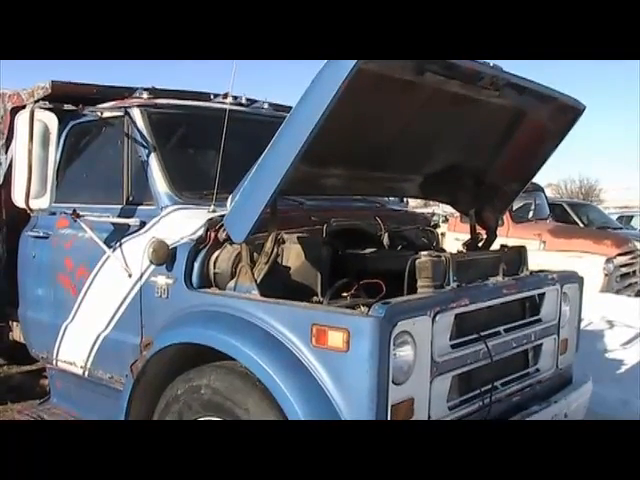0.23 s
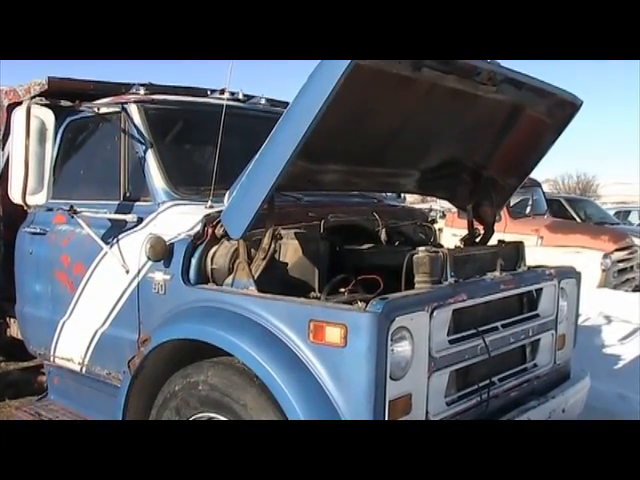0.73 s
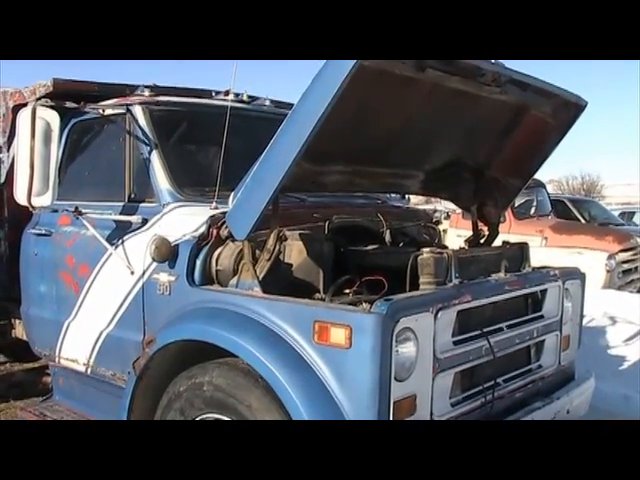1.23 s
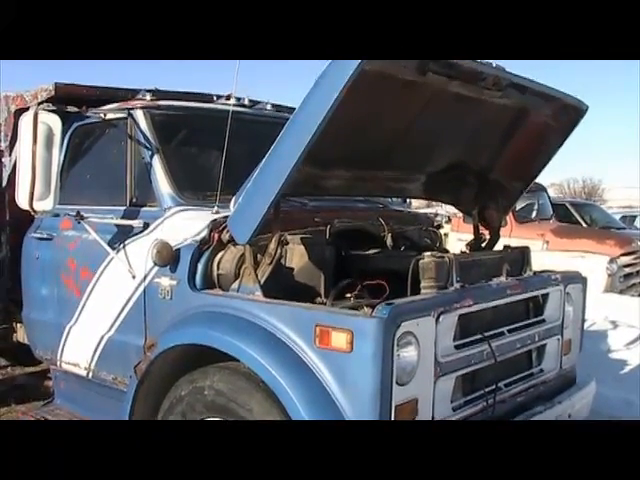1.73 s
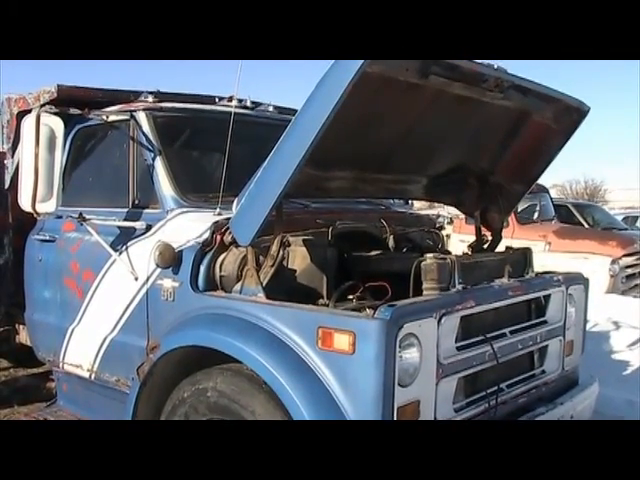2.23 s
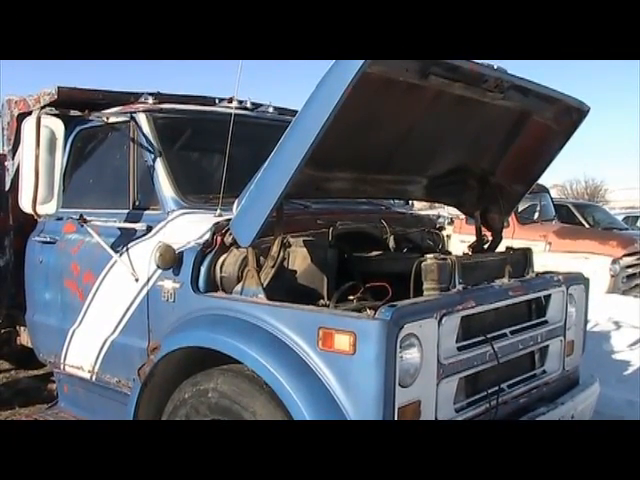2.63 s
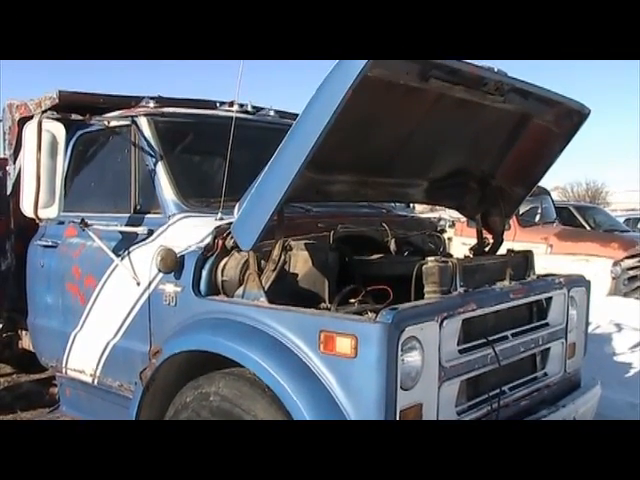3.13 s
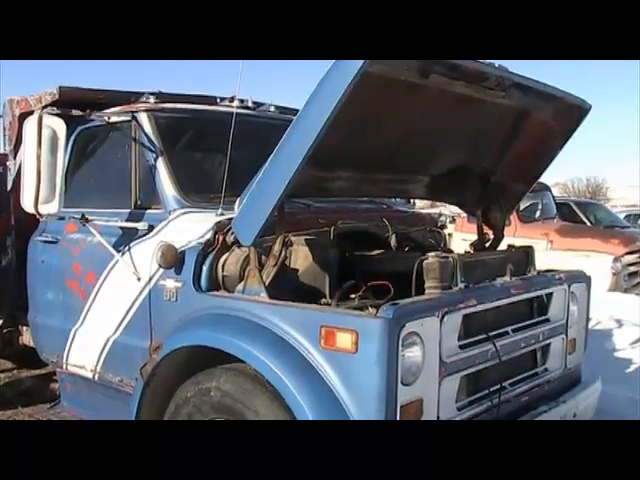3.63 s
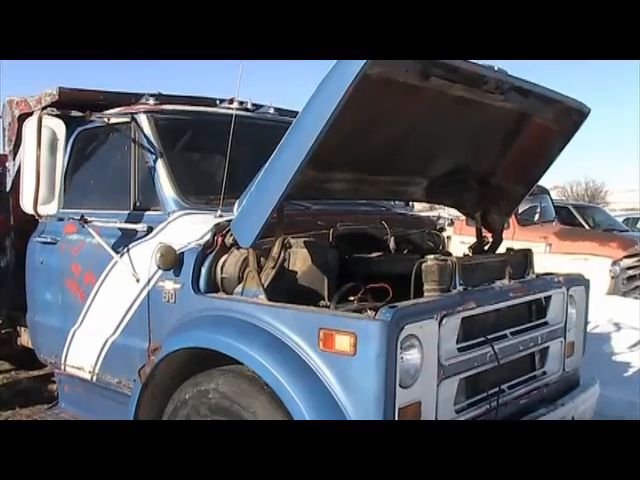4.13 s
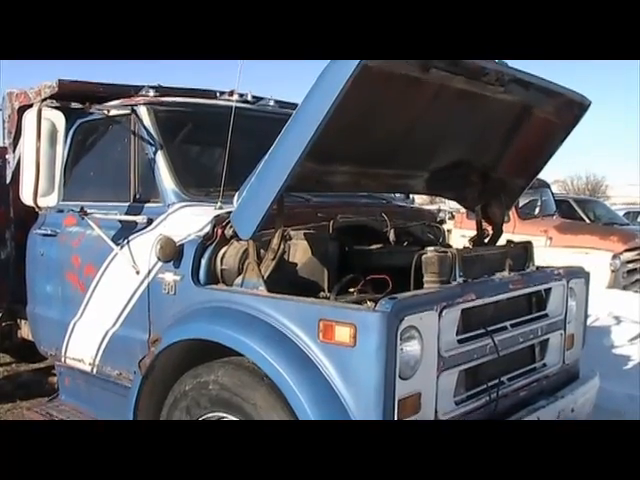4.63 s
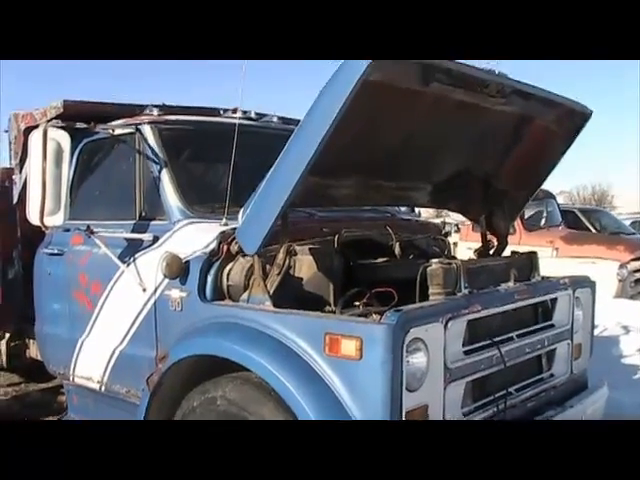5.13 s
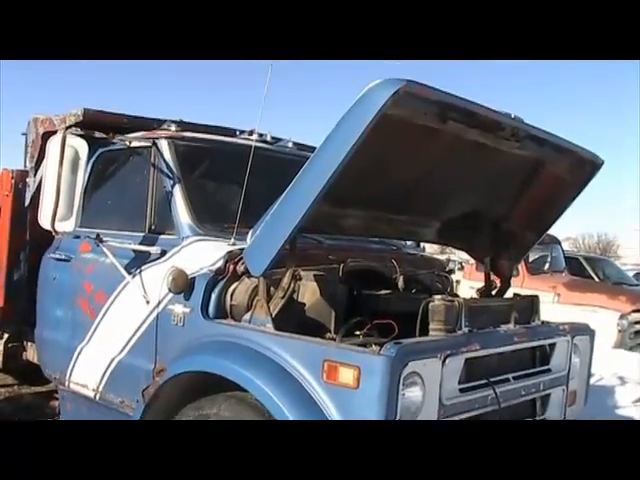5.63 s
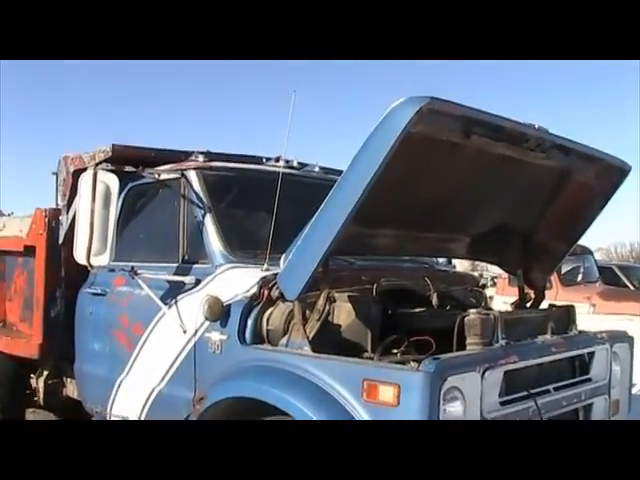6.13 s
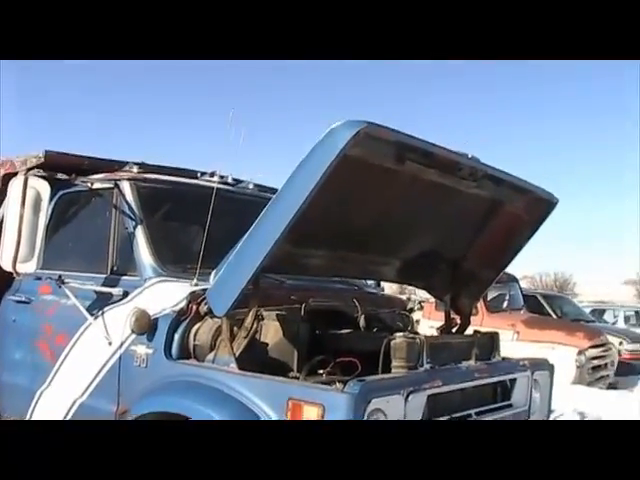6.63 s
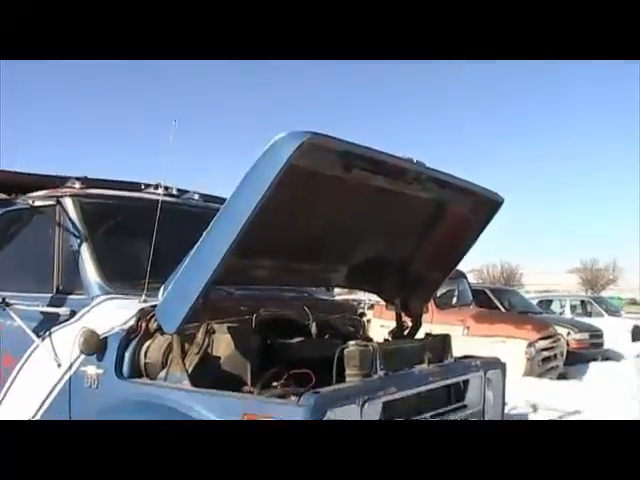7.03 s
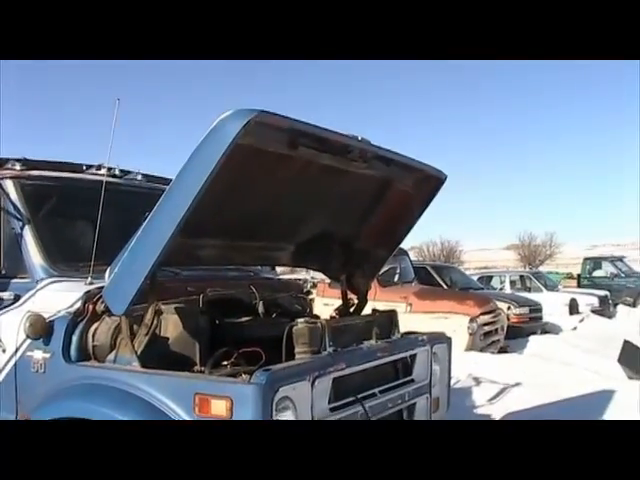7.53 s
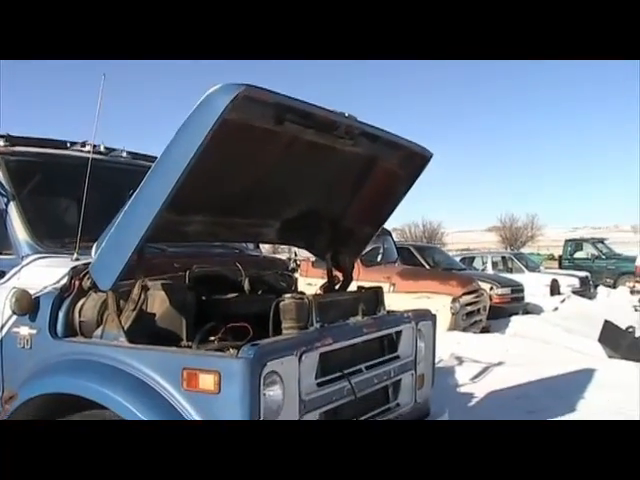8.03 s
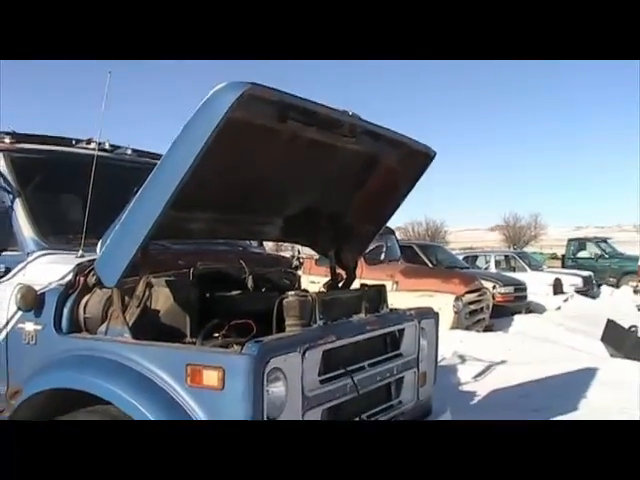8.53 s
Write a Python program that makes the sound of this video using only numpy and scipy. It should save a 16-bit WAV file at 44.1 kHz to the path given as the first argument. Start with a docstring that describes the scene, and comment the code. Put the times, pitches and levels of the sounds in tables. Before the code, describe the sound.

An old truck engine sputters out, its pedal clanks through several pumps, then the starter grinds and the engine catches into a lumpy, clacking, slowing idle.

```python
"""An old V8 truck outdoors, hood open, in quiet air with lumps of wind and a small camera's faint ticks.
First the engine sputters out: single puffs ring the exhaust pipe, air leaks whistle, a whir runs down.
Then the throttle pedal is pumped: filtered noise scrapes, and noise bursts ring rods and cab floor as blows.
The starter engages and grinds, its tooth noise ringing the bell housing over motor hum and whine.
The cylinders catch as a train of firings in the pipe; the idle turns lumpy and slows, with valve clacks."""
import sys
import numpy as np
from scipy import signal
from scipy.fft import rfft, irfft, next_fast_len
from scipy.io import wavfile
from scipy.ndimage import uniform_filter1d

SR = 44100
rng = np.random.default_rng(int(sys.argv[2]) if len(sys.argv) > 2 else 0)


def to_wav(s):
    """Save 16-bit WAV."""
    ch = np.atleast_2d(s).T  # columns
    pcm = np.round(np.clip(ch, -1, 1) * 32767)  # PCM
    wavfile.write(sys.argv[1], SR, pcm.astype(np.int16))


N = 387638


def amp(db):
    """Turns decibels into a gain."""
    return 10 ** (np.asarray(db) / 20)


def unit(x):
    """Scales a sound to an RMS of one."""
    return x / np.sqrt(np.mean(x ** 2) + 1e-20)


def peak(x):
    """Scales a sound to a peak of one."""
    return x / abs(x).max()


def noise():
    """White noise as long as the scene."""
    return rng.standard_normal(N)


def read(points, hz):
    """Reads a spectrum table along a logarithmic frequency axis."""
    f, value = np.transpose(points)
    return np.interp(np.log(hz + 1), np.log(f + 1), value)


def curve(rows, column=1):
    """Draws a table column over time as straight lines."""
    rows = np.array(rows)
    return np.interp(np.arange(N) / SR, rows[:, 0], rows[:, column])


def level(rows, column=1):
    """Gain along a dB column, silent outside the table, with 10 ms edges."""
    t = np.arange(N) / SR
    inside = (t >= rows[0][0]) & (t <= rows[-1][0])
    return amp(curve(rows, column)) * uniform_filter1d(inside * 1., 441)


def add(mix, s, sound):
    """Lays a sound into the mix at s seconds."""
    part = mix[round(s * SR):][:len(sound)]
    part += sound[:len(part)]


def colour(x, points):
    """Filters a sound by a spectrum table in dB."""
    size = next_fast_len(len(x))
    return irfft(rfft(x, size) * amp(read(points, np.fft.rfftfreq(size, 1 / SR))), size)[:len(x)]


def resonate(x, hz, width):
    """One resonance: shifts hz down to zero, smooths, and shifts back."""
    turn = np.exp(2j * np.pi * np.cumsum(hz * np.ones(len(x))) / SR)
    r = np.exp(-np.pi * width / SR)
    return 2 * (turn * signal.lfilter([1 - r], [1, -r], x / turn)).real


def band(x, modes):
    """A drive heard through a set of resonances, added with alternating signs."""
    total = 0
    for k, (hz, width, db) in enumerate(modes):
        total = total + (-1) ** k * amp(db) * unit(resonate(x, hz, width))
    return unit(total)


def flutter(per_s, db):
    """Random level changes at about the given rate, with an RMS swing of db."""
    return amp(db * unit(uniform_filter1d(noise(), int(SR / per_s))))


def follow(train, decay_s):
    """A throb that jumps at each firing and dies away."""
    return signal.lfilter([1], [1, -np.exp(-1 / (decay_s * SR))], train)


def ring(modes, t, scatter_db, detune, count):
    """Impulse response of loose parts: every mode splits in a few, stirred differently by each blow."""
    hz, db, t60 = np.repeat(modes, repeats=count, axis=0).T[:, :, None]
    chance = rng.standard_normal((2, len(hz), 1))
    fade = amp(db + scatter_db * chance[0] - 60 * t / t60)
    return (fade * np.sin(2 * np.pi * hz * (1 + detune * chance[1]) * t)).sum(0)


# hiss of the yard and the camera: (frequency [Hz], spectrum level [dB per Hz])
AIR_SPECTRUM = [(15, -23), (25, -1), (322, -3), (358, -10), (399, -3.5), (455, -4), (1820, -15),
                (1970, -14.5), (2500, -19.5), (3260, -17.5), (7650, -24.5), (10800, -29), (14500, -38)]
# lumps of wind: (time [s], reference level [dB])
WIND = [(0.0, -39), (0.4, -38), (0.83, -58), (1.2, -55), (2.4, -55), (2.7, -49), (3.35, -44), (3.6, -59.5),
        (4.3, -73), (4.64, -48), (5.3, -49), (5.6, -37)]
AIR_DB = -49.5  # reference level of the hiss


def yard():
    """Quiet air, mostly unlike at the two ports, and low resonant lumps of wind."""
    shared, left, right = (unit(colour(noise(), AIR_SPECTRUM)) for _ in range(3))
    air = amp(AIR_DB) * (0.031 * shared + .5 * np.array([left, right]))
    gusts = np.minimum(flutter(12, 3.), 1.6)
    middle, side = (unit(resonate(resonate(noise() * gusts, 48, 45), 49, 110)) for _ in range(2))
    opposite = np.array([[1], [-1]])
    return air + level(WIND) * (middle + 0.81 * opposite * side)


# clear ticks: (time [s], relative peak level [dB])
CAMERA_TICKS = [(0.873, -50), (0.9023, -55.0), (0.931, -62.6), (1.0193, -51), (1.086, -51), (1.131, -60.5),
                (1.1692, -50), (1.2068, -55), (1.2351, -52), (1.2901, -54), (1.3194, -52), (1.4364, -51),
                (1.5028, -50), (1.5383, -56.6), (1.5866, -51), (1.6236, -54), (1.6532, -52), (1.6906, -55),
                (3.4907, -57), (3.5383, -49.5), (3.5716, -51.5), (3.6006, -60), (3.6385, -53),
                (3.6909, -61.5), (3.7218, -55), (3.7591, -55), (3.7886, -52), (3.8387, -52),
                (3.8675, -61.5), (3.9055, -52), (3.9409, -57.5), (3.9888, -52), (4.026, -55.7),
                (4.0556, -53), (4.1344, -67), (4.1722, -54.2), (4.2389, -50), (4.2915, -58), (4.3227, -56),
                (4.3601, -57)]
# random ticks, in runs: (start [s], end [s], count, middle of the relative level range [dB])
FAINT_TICKS = [(1.74, 3.47, 40, -56), (.84, 4.37, 70, -64)]
TICK_HZ, TICK_DB = 3270, -1


def camera():
    """A motor in the camera ticks unevenly, a high tick just ahead of the ring."""
    rows = [np.array(CAMERA_TICKS)]
    for first, last, count, middle_db in FAINT_TICKS:
        late, size = rng.random((count, 2)).T
        when = first + (np.arange(count) + .8 * late) * (last - first) / count
        rows.append(np.c_[when, middle_db + 3 - 6 * size])
    s, db = np.concatenate(rows).T
    train = np.zeros(N)
    train[(s * SR).astype(int)] = amp(db)
    body = resonate(resonate(train, TICK_HZ, 170), TICK_HZ, 340)
    ahead = resonate(resonate(train, 4200, 600), 4200, 1200)
    ticks = peak(body) + 0.49 * np.roll(peak(ahead), -round(.005 * SR))
    return train.max() * amp(TICK_DB) * ticks


# one pump, the rods sliding down and back: (time before the stop [s], level [dB])
STROKE_SHAPE = [(0.2, -11.5), (0.18, -2), (0.16, -2), (0.064, -5), (0.064, -20), (0.054, -7.5),
                (0.0042, 9.5)]
# all pumps: (time of the stop [s], level [dB], heard from [s before the stop], heard until [s before it])
PEDAL_STROKES = [(1.803, -35, 0.059, 0.019), (2.162, -36, 0.23, 0.017), (2.496, -35.5, 0.22, 0.019),
                 (2.819, -36, 0.21, 0.0028), (3.157, -37.5, 0.245, 0.0067), (3.5, -41, 0.52, 0.082)]
# sliding rods: (frequency [Hz], spectrum level [dB per Hz])
SCRAPE_SPECTRUM = [(88, -35), (150, -1.5), (211, 8), (297, 4), (426, -1.5), (1330, -8), (1460, -10),
                   (1640, -10), (2690, -17.5), (6070, -20), (14000, -44)]


def scrape():
    """Sliding rods: fluttering noise; every pump plays its share of the same stroke."""
    before, db = np.transpose(STROKE_SHAPE)
    slide = np.zeros(N)
    for stop, pump_db, first, last in PEDAL_STROKES:
        at = np.r_[first, before[(before < first) & (before > last)], last]
        slide += level(np.c_[stop - at, pump_db + np.interp(-at, -before, db)])
    return unit(colour(noise() * flutter(120, 2.7), SCRAPE_SPECTRUM)) * slide


# what is struck, by name: (floor thud [dB], brightness [dB], rattle decay [s], rise [s],
# first hard contact [relative to the rattle noise])
STRUCK_PARTS = {"pedal": (1, -37, .0135, .0026, 2), "rebound": (0, -12, .0105, .005, 3),
                "catch": (-3, 7, .016, .0013, 4), "rod": (-18, 1, .0145, .005, 0),
                "stop": (-12, 3, .0125, .003, 3), "slack": (-9, 1, .012, .008, 0),
                "solenoid": (-41, -4, .014, .024, 0), "pinion": (-39, 8, .012, .004, 2)}
# modes of the pedal linkage: (frequency [Hz], level [dB], T60 [s])
LINKAGE_MODES = [(344, 5.5, 0.21), (451, 6, 0.13), (492, 5.5, 0.12), (593, 1.5, 0.092), (790, 7, 0.053),
                 (972, 3.5, 0.035), (1131, -3, 0.091), (1265, -2, 0.14), (1580, -17, 0.26),
                 (2356, 8, 0.045), (2900, -7, 0.05), (3470, 3, 0.028), (3920, 4, 0.043),
                 (4580, 10.5, 0.027), (6500, -26, 0.022)]
# modes of the starter pinion and solenoid: (frequency [Hz], level [dB], T60 [s])
PINION_MODES = [(500, -18, 0.22), (650, -2, 0.087), (890, -5, 0.076), (1290, 1, 0.12), (1540, 7, 0.14),
                (2020, 0.5, 0.17), (3120, -30, 0.041), (3640, 0, 0.041), (4910, -18, 0.041),
                (6470, -1, 0.031)]
# modes of the cab floor: (frequency [Hz], level [dB], T60 [s])
FLOOR_MODES = [(156.6, -9, 0.5), (198, -5.5, 0.65), (273, -7, 0.41)]
PUSH_S = 0.002  # length of the shove that a blow gives the cab floor


def strike(part):
    """A rattle with one hard contact rings the struck metal and the cab floor."""
    t = np.arange(SR // 3) / SR
    thud_db, bright_db, rattle_s, rise_s, contact = STRUCK_PARTS[part]
    at_starter = part in ("solenoid", "pinion")
    modes = np.array(PINION_MODES if at_starter else LINKAGE_MODES)
    treble = modes[:, 0] > 2000

    drive = rng.standard_normal(len(t)) * np.exp(-t / rattle_s) * np.minimum(t / rise_s, 1) ** 2
    drive[round(rise_s * SR)] += contact

    def rung(part_modes):
        """The drive rung through some of the modes."""
        response = ring(part_modes, t[:SR // 5], 3.8, 0.059, count=9)
        return peak(signal.fftconvolve(drive, response)[:len(t)])

    low, high = rung(modes[~treble]), rung(modes[treble])
    shove = np.hanning(round(PUSH_S * SR))
    floor = peak(np.convolve(ring(FLOOR_MODES, t, 7.1, 0.066, count=4), shove)[:len(t)])
    crack = peak(resonate(drive, 4200, 5000 if at_starter else 13000))
    clash = peak(low + 0.6 * peak(resonate(drive, 1300, 660)))
    return clash + amp(bright_db) * (0.29 * high + 0.75 * crack) + amp(thud_db) * floor


# blows of pedal linkage and starter pinion: (time [s], relative level [dB], part)
METAL_BLOWS = [(1.76, -27, "rebound"), (1.777, -20, "rod"), (1.804, -10.5, "stop"), (2.039, -18.5, "pedal"),
               (2.052, -16.5, "rebound"), (2.1, -28.5, "catch"), (2.135, -15.5, "rod"),
               (2.145, -14.5, "rod"), (2.16, -4, "stop"), (2.374, -21, "pedal"), (2.388, -23, "rebound"),
               (2.44, -26, "catch"), (2.469, -16.5, "rod"), (2.479, -14, "rod"), (2.501, -7, "stop"),
               (2.713, -23, "pedal"), (2.731, -19.5, "rebound"), (2.775, -31.5, "catch"),
               (2.812, -11.5, "slack"), (2.979, -36, "catch"), (3.038, -29, "pedal"),
               (3.049, -18.5, "rebound"), (3.121, -25.5, "catch"), (3.153, -16, "slack"),
               (3.421, -32.5, "pedal"), (4.388, -12, "solenoid"), (4.41, -18.5, "pinion"),
               (4.443, -11, "pinion")]
# band of the blows: (frequency [Hz], gain [dB])
BLOW_BAND = [(40, -67), (130, -11), (200, 0.5), (300, -9.5), (420, 3), (6000, -1), (9000, -6.5),
             (13000, -8.5), (14500, -19)]
CAB_DB, CAB_T60_S, CAB_HZ, CAB_WIDTH_HZ = -23.5, 0.31, 800, 920


def blows():
    """Rods slam on their stops and last the pinion meshes; cab and engine bay answer each blow."""
    out = np.zeros(N)
    for s, db, part in METAL_BLOWS:
        add(out, s, amp(db) * strike(part))
    t = np.arange(SR // 3) / SR
    cab = resonate(rng.standard_normal(len(t)), CAB_HZ, CAB_WIDTH_HZ) * amp(-60 * t / CAB_T60_S)
    answer = signal.oaconvolve(out, cab / np.linalg.norm(cab))[:N]
    return colour(out + amp(CAB_DB) * answer, BLOW_BAND)


# the pinion seats: (time [s], length [s], level [dB])
PINION_SQUEAKS = [(4.41, .025, -18.5), (4.549, .05, -36), (4.636, .032, -34.5)]
SQUEAK_HZ, SQUEAK_WANDER_HZ = 1890, 23


def squeaks():
    """The seating pinion squeaks: short tones with rounded ends, wandering about a common pitch."""
    out = np.zeros(N)
    for s, length, db in PINION_SQUEAKS:
        size = round(length * SR)
        hz = SQUEAK_HZ + SQUEAK_WANDER_HZ * unit(uniform_filter1d(rng.standard_normal(size), 300))
        tone = np.sqrt(2) * np.sin(2 * np.pi * np.cumsum(hz) / SR)
        add(out, s, amp(db) * np.hanning(size) ** .5 * tone)
    return out


# starter: (time [s], grind level [dB], motor hum level [dB], gear whine level [dB])
STARTER_LEVELS = [(4.44, -19, -33, -16), (4.49, -33, -26.5, -66), (4.64, -30, -66, -53),
                  (4.89, -30.5, -66, -43), (5.1, -28.5, -57, -33), (5.45, -26, -33.5, -33),
                  (5.62, -24.5, -26.5, -36.5), (5.78, -19, -36, -27), (5.95, -18.5, -39, -47),
                  (6.06, -20, -27.5, -51), (6.2, -22, -22.5, -50), (6.31, -25, -44, -58),
                  (6.57, -25, -28, -51), (6.8, -29, -48, -34), (7.3, -35, -55, -45)]
# resonances of the housing: (frequency [Hz], width [Hz], level [dB])
HOUSING_MODES = [(642.7, 22, -3), (760, 270, -6.5), (696.5, 15, -9), (874, 43, -3.5), (926, 60, -4.5),
                 (994, 16, -6.5), (1122, 67, -9), (1234, 45, -9), (1466, 74, -10.5), (1642, 20, -11.5),
                 (1904, 570, -8)]
# resonances of the gears: (frequency [Hz], width [Hz], level [dB])
GEAR_MODES = [(3090, 90, 0), (3520, 150, 0)]
# the grind's treble falls away steeply: (frequency [Hz], gain [dB])
GRIND_ROLLOFF = [(2000, -1), (6000, -8.5), (9000, -23), (12000, -60)]
# held note of the bell housing: (time [s], level [dB], pitch [Hz])
BELL_NOTE = [(4.46, -23, 483), (4.49, -30, 480), (4.6, -36, 500), (4.77, -36, 474), (4.8, -42, 479),
             (4.98, -19, 487), (5.04, -36, 483), (5.13, -32, 479.4), (5.22, -36.5, 476), (5.26, -26, 486),
             (5.33, -33, 491), (5.43, -36, 490), (5.46, -22, 492), (5.51, -35, 493.3), (5.56, -26, 487),
             (5.7, -29, 486), (5.75, -45, 487), (5.79, -23.5, 483.8), (5.87, -29.5, 477),
             (5.95, -22.5, 484.6), (6.0, -26.5, 491), (6.13, -29, 499), (6.23, -23.5, 487),
             (6.46, -30.5, 486.6), (6.59, -33, 498), (6.68, -32, 477), (6.77, -40, 480), (6.82, -47, 485),
             (6.85, -38, 486), (6.9, -31, 488)]
# modes of the bell housing: (ratio to the held note, width [Hz], level [dB])
BELL_MODES = [(1.0, 9.4, 1), (1.07, 38, -3), (.93, 9.1, -11.5)]
# armature winding up: (time [s], pitch [Hz], level [dB])
ARMATURE_WHINE = [(4.5, 910, -50), (4.58, 973, -41), (4.68, 1064, -37), (4.8, 1138, -42), (4.9, 1150, -56)]
HUM_HZ, HUM_SAG_HZ_PER_S = 191, 3.1
GNASH_PER_S, GNASH_DB = 130, -5  # teeth that strike hard, level before the housing
WANDER = 0.016  # slow drift of the housing's pitch (RMS share)
SURGE_PER_S, SURGE_DB = 14, 0.5  # the load surges at random


def starter():
    """Gear teeth chatter and gnash into the bell housing over the hum and whine of the motor."""
    t = np.arange(N) / SR
    hard = rng.random(N) < GNASH_PER_S / SR
    gnash = hard * rng.uniform(-0.85, 1, N) * np.minimum(flutter(12, 2.1), 1.6)
    teeth = noise() * flutter(210, 0.81) + amp(GNASH_DB) * unit(gnash)

    slow = uniform_filter1d(uniform_filter1d(noise(), SR // 8), SR // 8)
    drift = 1 + WANDER * unit(slow)
    housing = [(hz * drift, width, db) for hz, width, db in HOUSING_MODES]
    grind = band(teeth, housing) * level(STARTER_LEVELS)
    grind += band(teeth, GEAR_MODES) * level(STARTER_LEVELS, 3)

    bell = [(ratio * curve(BELL_NOTE, 2), width, db) for ratio, width, db in BELL_MODES]
    held = band(noise(), bell)
    even = held / uniform_filter1d(held ** 2, SR // 60) ** 0.45  # rings more evenly than noise
    song = level(BELL_NOTE) * unit(even)

    whine = unit(resonate(noise(), curve(ARMATURE_WHINE), 10)) * level(ARMATURE_WHINE, 2)
    hum = resonate(noise(), HUM_HZ - HUM_SAG_HZ_PER_S * (t - STARTER_LEVELS[0][0]), 18.0)
    hum = unit(hum / uniform_filter1d(hum ** 2, SR // 20) ** 0.23) * level(STARTER_LEVELS, 2)
    return song + whine + flutter(SURGE_PER_S, SURGE_DB) * (colour(grind, GRIND_ROLLOFF) + hum)


# clacks of the valve gear: (time [s], relative level [dB], pitch [Hz], nominal rattle [s], sizzle [dB])
VALVE_CLACKS = [(0.018, -34, 1930.0, 0.0135, -19.9), (0.09, -35.7, 1970.0, 0.0057, -20.0),
                (0.1165, -33, 1490.0, 0.011, -12), (0.211, -36.8, 1680.0, 0.0034, -20.0),
                (0.311, -33, 1310, 0.018, -15.9), (0.407, -27.5, 2520.0, 0.0085, -16.9),
                (0.489, -38, 1220.0, 0.02, -20.0), (0.596, -43, 1280.0, 0.0036, -8.5),
                (0.779, -44, 2170.0, 0.015, 0), (5.114, -24.5, 1270.0, 0.0204, -4),
                (5.229, -22, 3530, 0.0052, -5.8), (5.534, -20, 1860, 0.011, -15),
                (5.568, -25, 1310, 0.0043, -20.0), (5.614, -22.3, 2830, 0.0077, -4),
                (5.75, -20.5, 2580.0, 0.0071, -20.0), (5.819, -23.5, 3650, 0.01, 5.5),
                (5.999, -24.4, 1230.0, 0.0067, -20.0), (6.367, -27.7, 2000, 0.0054, -13.2),
                (6.393, -23, 2860, 0.011, -21), (6.451, -20, 1570.0, 0.0027, -12.2),
                (6.519, -25, 1920.0, 0.015, -15.4), (6.567, -22, 1930.0, 0.0054, -20.0),
                (6.589, -24, 2870, 0.017, -5), (6.66, -20, 2830, 0.0076, -16),
                (6.7, -24.5, 2530.0, 0.0104, -14), (6.745, -20.5, 2770, 0.0112, -20.0),
                (6.767, -21.5, 2850, 0.011, -3), (6.873, -19, 1510, 0.0047, -20.0),
                (6.935, -19.6, 1110.0, 0.0098, -3.5), (6.959, -23, 1670.0, 0.0058, -20.0),
                (7.038, -24.8, 1220.0, 0.0109, -17.4), (7.081, -24.6, 1520.0, 0.0052, -19.0),
                (7.1, -19.5, 2800, 0.0157, -9), (7.149, -26, 2900.0, 0.0079, -13),
                (7.205, -19, 1530, 0.0056, -12), (7.268, -20, 2880, 0.011, -13),
                (7.314, -27.5, 3220, 0.022, -12), (7.373, -29.6, 1520.0, 0.0054, -3),
                (7.417, -31, 1610.0, 0.0083, -12), (7.436, -21.5, 1240, 0.022, -12),
                (7.576, -35, 2410.0, 0.0045, -20.0), (7.591, -22.5, 2550.0, 0.0075, -23),
                (7.609, -20.5, 1530.0, 0.013, -7.5), (7.66, -22, 1480.0, 0.0063, -18),
                (7.7195, -15, 1500, 0.0042, -27), (7.764, -24, 1540.0, 0.005, -9.3),
                (7.784, -25.5, 1930, 0.016, -4.5), (7.812, -29.7, 2280.0, 0.0057, -12.6),
                (7.832, -22, 1340.0, 0.0068, -16.4), (7.894, -18.5, 1500, 0.0084, -25),
                (7.94, -25, 2150, 0.0085, -15.2), (7.96, -22.5, 2830, 0.018, -10),
                (8.015, -23, 1340.0, 0.0068, -18.0), (8.034, -24.5, 1330, 0.011, -15.6),
                (8.075, -22.5, 1470, 0.012, -18), (8.126, -25, 1430.0, 0.0064, -11.1),
                (8.147, -20, 2860, 0.011, -7), (8.204, -31, 2450.0, 0.0115, -16.1),
                (8.224, -30.5, 1560, 0.016, -7.4), (8.27, -21, 2360, 0.011, -13.4),
                (8.32, -15.5, 2760, 0.0067, -15), (8.4, -31, 1350.0, 0.017, -7),
                (8.473, -18.5, 1680, 0.011, -14.3), (8.525, -23, 1360.0, 0.0087, -8),
                (8.616, -30, 1290.0, 0.011, -14), (8.632, -24, 2790.0, 0.013, -18),
                (8.686, -16.5, 3030, 0.011, -19), (8.7415, -15, 2850, 0.0092, -12.5)]
# one deeper knock from the block: (time [s], relative level [dB], pitch [Hz], nominal rattle [s], sizzle [dB])
BLOCK_KNOCK = (8, -17.5, 940, .012, -21)
# random small ticks of the lifters, which fall 8 to 20 dB below it: (time [s], reference level [dB])
LIFTER_TICKS = [(6.3, -36), (6.8, -13), (7.6, -14), (8.79, -39)]
# resonances of the valve covers: (frequency [Hz], width [Hz], level [dB])
COVER_MODES = [(1485, 130, 14.5), (1975, 93, 12), (2397, 100, 17), (2945, 270, 16.5), (3964, 160, 4.5),
               (6050, 9000, 2)]
# band of the clacks: (frequency [Hz], gain [dB])
CLACK_BAND = [(300, -25), (800, 3), (4200, -1.5), (7000, 5), (10000, -8), (14000, -39)]
LIFTER_TICK_COUNT = 70
CLACK_RISE_S, CLACK_COVER_DB, SIZZLE_HZ, SIZZLE_WIDTH_HZ = 0.0014, -1, 6400, 4200


def lifter_ticks():
    """Scatters small ticks at random, each on the pitch of one valve cover resonance."""
    when, size, cover = rng.random((LIFTER_TICK_COUNT, 3)).T
    when = LIFTER_TICKS[0][0] + when * (LIFTER_TICKS[-1][0] - LIFTER_TICKS[0][0])
    db = np.interp(when, *np.transpose(LIFTER_TICKS)) - 8 - 12.0 * size
    pitch = np.array(COVER_MODES)[(cover * 5).astype(int), 0]
    return [(s, tick_db, hz, .003, -14) for s, tick_db, hz in zip(when, db, pitch)]


def valves():
    """Short metal rattles ring the valve covers, each with its own leading pitch, length and sizzle."""
    out, t = np.zeros(N), np.arange(SR // 12) / SR
    for s, db, hz, rattle_s, sizzle_db in [*VALVE_CLACKS, BLOCK_KNOCK, *lifter_ticks()]:
        hold = np.minimum(t / CLACK_RISE_S, 1) * np.exp(-(t / max(0.94 * rattle_s, .001)) ** 2)
        drive = np.sign(rng.standard_normal(len(t))) * hold
        lead = resonate(resonate(drive, hz, 150), hz, 730)
        clack = unit(unit(lead) + amp(CLACK_COVER_DB) * band(drive, COVER_MODES))
        sizzle = band(drive, [(4020, 200, .5), (SIZZLE_HZ, SIZZLE_WIDTH_HZ, -2)])
        clack += amp(sizzle_db) * sizzle
        add(out, s - .001, amp(db) * clack * np.sqrt(np.mean(hold ** 2)))
    hood = np.zeros(SR // 20)  # the raised hood throws each clack back
    hood[[0, round(.0065 * SR), round(.012 * SR), round(.021 * SR)]] = 0.86, -0.32, 0.17, 0.15
    return colour(signal.oaconvolve(out, hood)[:N], CLACK_BAND)


# crankshaft speed from the first turn: (time [s], speed [turns per minute])
CRANK_SPEED = [(4.83, 391.6), (5.85, 527.4), (6.25, 518.8), (6.4, 624.3), (7.0, 733.9), (7.3, 706.9),
               (8.0, 676), (8.1, 619.1), (9.1, 504.5)]


def crank(places):
    """Times at which the engine passes the given places (0-1) of every two-turn cycle, one row a cycle."""
    step_s = 1e-4
    t = np.arange(CRANK_SPEED[0][0], CRANK_SPEED[-1][0], step_s)
    cycles = np.cumsum(np.interp(t, *np.transpose(CRANK_SPEED))) * step_s / 120
    return np.interp(np.arange(int(cycles[-1]))[:, None] + places, cycles, t)


# firing order as heard at the tail pipes: (place in the cycle [eighths], relative strength [dB])
FIRING_ORDER = [(-.1, -6.5), (.95, -8.5), (1.9, -4), (2.898, -2), (3.95, -8.5), (5.149, -6.5), (5.95, -9.5),
                (7.35, -8)]
# scatter of the firings: (time [s], strength scatter [dB])
FIRING_SCATTER = [(4.8, 4), (6.3, 3.5), (6.75, 1.5), (7.9, 1.5), (8.3, 3.5)]
TIMING_SCATTER_S_PER_DB = 0.00051


def firings():
    """Impulse train of the cylinders, each firing once in two turns, uneven in time and strength."""
    place, db = np.transpose(FIRING_ORDER)
    s = crank(place / len(place)).ravel()
    chance = rng.standard_normal((len(s), 2))
    uneven_db = np.interp(s, *np.transpose(FIRING_SCATTER))
    s = s + TIMING_SCATTER_S_PER_DB * uneven_db * chance[:, 0]
    train = np.zeros(N + SR)
    train[(s * SR).astype(int)] = amp(np.resize(db, len(s)) + uneven_db * chance[:, 1])
    return train[:N]


# air leaks as the engine stalls: (frequency [Hz], width [Hz], level [dB])
LEAK_WHISTLES = [(5360, 160, -12), (6600, 110, 7.5), (8720, 150, 3.5), (9700, 71, -0.5), (10850, 96, -5),
                 (11750, 60, -8), (12600, 210, -1), (13700, 150, -4)]
# leaks, steady with a last gasp: (time [s], level [dB])
LEAK_LEVELS = [(0, -50), (.7, -51), (.765, -57), (.785, -45.5), (.84, -99)]
# the hood swells twice: (time [s], level [dB])
HOOD_DRONE = [(0, -50), (.18, -40), (.36, -47), (.46, -56), (.53, -40), (.74, -58.5), (1.05, -66)]
# a whir runs down after the stall: (time [s], level [dB])
WHIR_LEVELS = [(.55, -48), (.8, -56), (1.0, -62.5), (1.25, -62.5), (1.6, -68)]
WHIR_HZ, WHIR_WIDTH_HZ = 1040, 160


def stall_tones():
    """Noise through narrow resonances: whistling leaks, a droning hood and a whir."""
    drone = unit(resonate(noise(), 424, 16)) * level(HOOD_DRONE)
    whir = unit(resonate(noise(), WHIR_HZ, WHIR_WIDTH_HZ)) * level(WHIR_LEVELS)
    return band(noise(), LEAK_WHISTLES) * level(LEAK_LEVELS) + drone + whir


# two stretches, stalling and starting: (time [s], block roar level [dB], intake hiss level [dB])
BAY_LEVELS = [
    [(0.0, -31, -43.5), (0.25, -30.5, -44), (0.64, -39.5, -46.5), (0.78, -46.5, -51), (0.856, -48, -74),
     (0.95, -56, -80), (1.35, -70, -80)],
    [(4.46, -49, -51), (4.56, -31.5, -40), (4.8, -36.5, -38), (4.86, -38.5, -34), (5.0, -35, -36.5),
     (5.05, -42, -30), (5.13, -26.5, -29), (5.52, -34.5, -25), (5.89, -21, -22.5), (6.09, -36, -26),
     (6.35, -27.5, -27.5), (6.75, -22.5, -29), (7.4, -25, -33.5), (8.2, -26.5, -33.5), (8.79, -28, -33)],
]
# block roar: (frequency [Hz], spectrum level [dB per Hz])
ROAR_SPECTRUM = [(88, -21), (150, 5), (266, -1), (341, -8.5), (500, 1.5), (1120, -9.5), (1500, -10),
                 (2660, -15), (2860, -59), (3360, -18), (5000, -45), (6500, -54), (11000, -120)]
# intake hiss, throttle open: (frequency [Hz], spectrum level [dB per Hz])
OPEN_HISS_SPECTRUM = [(880, -30), (1500, -5), (2340, -7.5), (3590, 0.5), (4140, -6), (5450, -2), (7320, -4),
                      (10000, -23.5), (11800, -36), (13700, -72), (14500, -69)]
# intake hiss, throttle nearly shut: (frequency [Hz], spectrum level [dB per Hz])
IDLE_HISS_SPECTRUM = [(880, -3.5), (1500, -4.5), (2230, -14.5), (2860, -8.5), (4730, -11.5), (8680, -13.5),
                      (11000, -28.5), (12700, -19.5), (14100, -43), (14500, -55)]
# throttle: (time [s], opening [0-1])
THROTTLE_OPENING = [(4.4, 1), (6.3, 1), (7.4, 0)]


def bay(train):
    """Block roar, tappet clatter and intake hiss throb with the firings; the throttle shades the hiss."""
    throb = follow(train, 0.011)
    opening = curve(THROTTLE_OPENING)
    rough = noise() * np.minimum(flutter(300, 2.5), 1.7)
    roar = unit(colour(rough, ROAR_SPECTRUM)) * (.65 + .5 * throb)
    tappets = noise() * follow(train * flutter(60, 2.5), .004)
    roar += amp(-21.5) * (1.3 - opening) * band(tappets, COVER_MODES)

    air = noise() * flutter(340, 0.67)
    wide = unit(colour(air, OPEN_HISS_SPECTRUM))
    shut = unit(colour(air, IDLE_HISS_SPECTRUM))
    hiss = (shut + opening * (wide - shut)) * (0.73 + 0.5 * throb)
    return sum(roar * level(rows) + hiss * level(rows, 2) for rows in BAY_LEVELS)


# resonances of the exhaust pipe: (frequency [Hz], width [Hz], level [dB])
PIPE_MODES = [(47.7, 10, -29), (74.4, 17, -11), (93.2, 38.4, 8.5), (112.5, 22, -18), (142, 160, -15.5),
              (180.5, 75, -7), (238, 44, -22)]


def pipe_note():
    """One slug of gas ringing the exhaust pipe: decaying cosines with a soft start."""
    t = np.arange(SR // 8) / SR
    note = 0
    for hz, width, db in PIPE_MODES:
        note = note + amp(db) * width * np.exp(-np.pi * width * t) * np.cos(2 * np.pi * hz * t)
    return note * (1 - np.exp(-t / 0.0036))


# running engine: (time [s], level [dB])
EXHAUST_LEVELS = [(4.9, -70), (5.1, -41), (5.6, -32), (5.97, -25), (6.07, -26), (6.2, -26.5), (6.6, -20),
                  (6.9, -18.5), (7.6, -19.5), (8.3, -23.5), (8.79, -24.5)]
# single puffs of the stalling engine: (time [s], peak level [dB])
STALL_PUFFS = [(0.031, -23), (0.088, -25), (0.123, -20.5), (0.185, -28), (0.217, -21), (0.269, -31),
               (0.316, -21), (0.376, -22), (0.414, -22), (.45, -37), (0.476, -37), (0.525, -34),
               (0.559, -42), (0.677, -37), (.78, -56), (.88, -59), (1.068, -46.5), (1.13, -43), (1.2, -52),
               (1.396, -37), (1.425, -41), (1.552, -24.5)]
GAS_RUSH_DB = -36.5  # turbulence in the pipe between firings
PUFF_RISE_S, PUFF_S = 0.0053, 0.02  # a lone puff swells softly and dies faster than the pipe note


def exhaust(train):
    """Firings and gas rush ring the pipe; the stalling engine gives single puffs."""
    note = pipe_note()
    run = signal.oaconvolve(train + amp(GAS_RUSH_DB) * noise(), note)[:N]
    loudness = np.sqrt(uniform_filter1d(run ** 2, SR // 3) + 1e-3 * np.mean(run ** 2))
    out = level(EXHAUST_LEVELS) * run / loudness
    swell = np.hanning(round(PUFF_RISE_S * SR))
    puff = peak(np.convolve(note * np.exp(-np.arange(len(note)) / (PUFF_S * SR)), swell))
    for s, db in STALL_PUFFS:
        add(out, s - PUFF_RISE_S, amp(db) * puff)
    return out


# phase by which left leads right: (frequency [Hz], lead [radians])
PORT_LEAD = [(30, 0.95), (250, 0.15), (3000, 0.22), (9000, 0.11)]
# balance of the direct sound: (frequency [Hz], left over right [dB])
PORT_TILT = [(30, -2.5), (250, 0.2), (2500, -0.3), (12000, -1.5)]
# reflections from the sides: (frequency [Hz], level [dB])
SIDE_REFLECTIONS = [(60, -24), (500, -23), (2000, -13.5), (5000, -11), (10000, -4.5)]


def ports(x):
    """Two close microphone ports: a small lead and tilt, and side reflections of opposite sign."""
    size = next_fast_len(N + SR)
    hz, t = np.fft.rfftfreq(size, 1 / SR), np.arange(SR // 5) / SR
    tail = rng.standard_normal(len(t)) * amp(-60 * t / .14)
    side = rfft(tail / np.linalg.norm(tail), size) * amp(read(SIDE_REFLECTIONS, hz))
    pair = amp(read(PORT_TILT, hz) / 2) * np.exp(.5j * read(PORT_LEAD, hz))
    return irfft(rfft(x, size) * np.array([pair + side, 1 / pair - side]), size)[:, :N]


def scene():
    """The truck through the two ports, over the air of the yard."""
    train = firings()
    pedal_and_starter = scrape() + blows() + squeaks() + starter()
    engine = valves() + stall_tones() + bay(train) + exhaust(train)
    return yard() + ports(camera() + pedal_and_starter + engine)


EDGE_HZ = 14700  # upper band limit


def record(dry):
    """The microphone drops the lowest bass; then the band limit."""
    thinned = signal.sosfilt(signal.butter(2, 25., "high", fs=SR, output="sos"), dry)
    lowpass = signal.firwin(511, EDGE_HZ, window=("kaiser", 9), fs=SR)
    return signal.oaconvolve(thinned, lowpass[None], "same")


dry = scene()
out = record(dry)
to_wav(out)
```